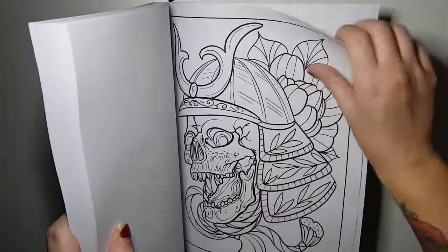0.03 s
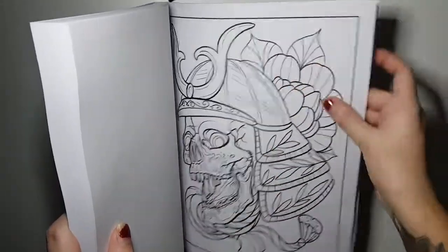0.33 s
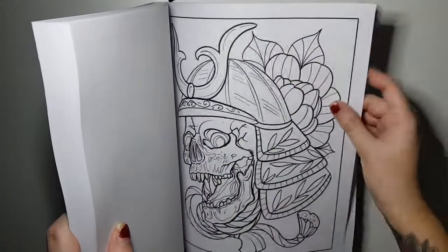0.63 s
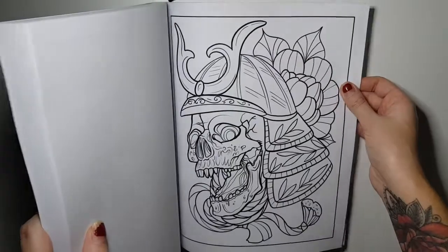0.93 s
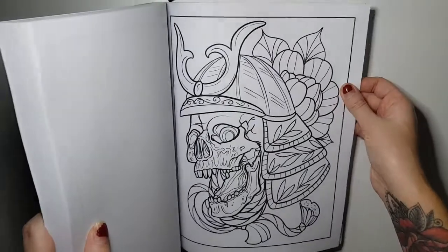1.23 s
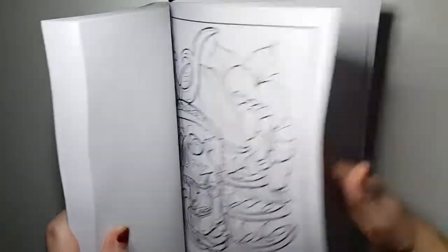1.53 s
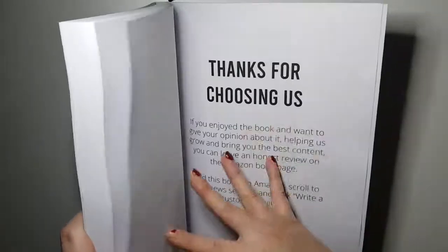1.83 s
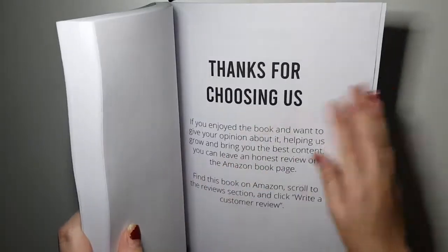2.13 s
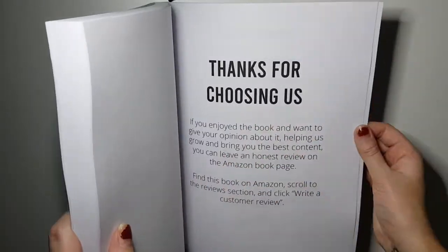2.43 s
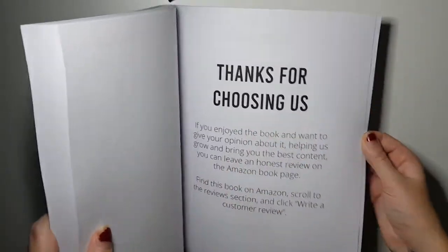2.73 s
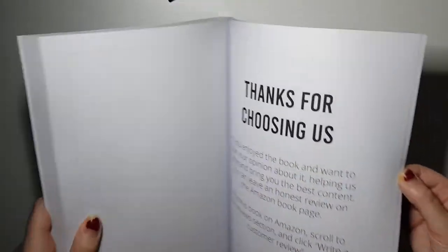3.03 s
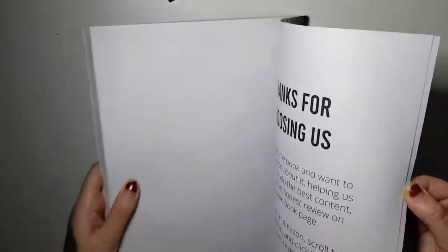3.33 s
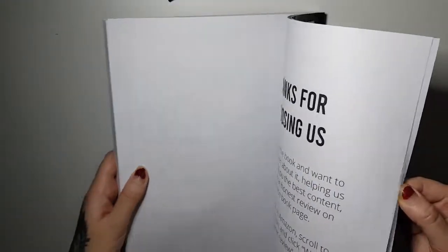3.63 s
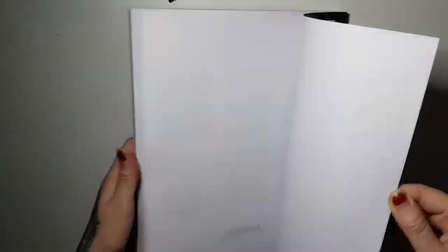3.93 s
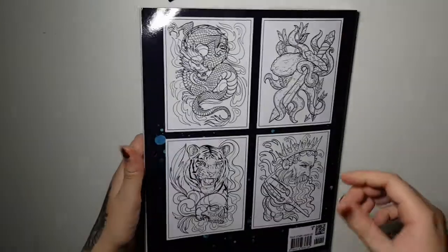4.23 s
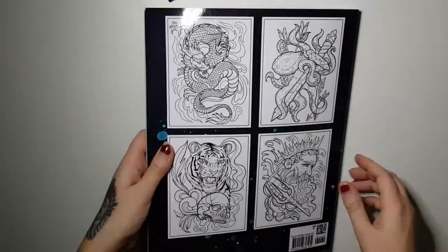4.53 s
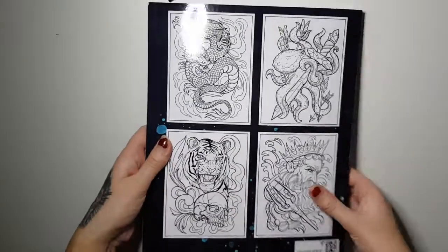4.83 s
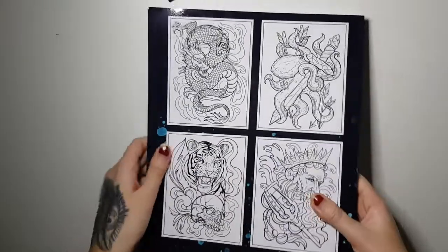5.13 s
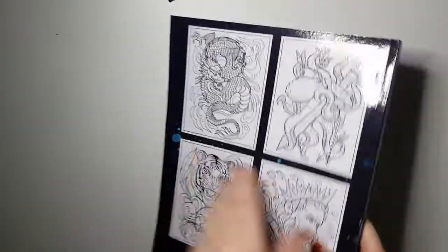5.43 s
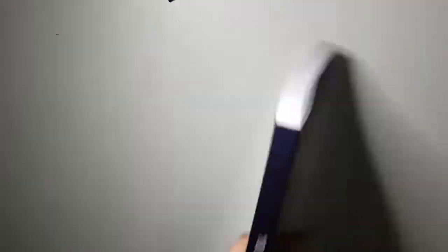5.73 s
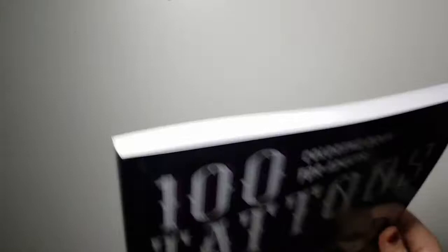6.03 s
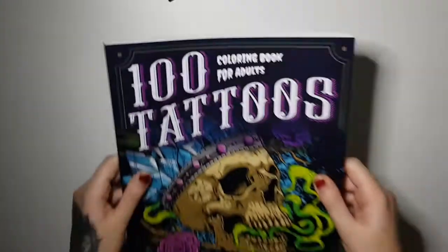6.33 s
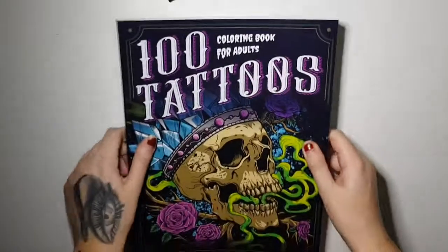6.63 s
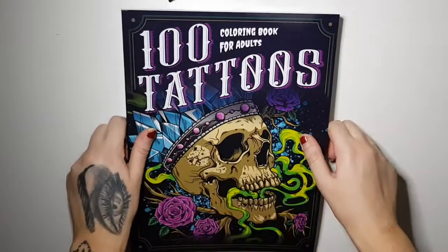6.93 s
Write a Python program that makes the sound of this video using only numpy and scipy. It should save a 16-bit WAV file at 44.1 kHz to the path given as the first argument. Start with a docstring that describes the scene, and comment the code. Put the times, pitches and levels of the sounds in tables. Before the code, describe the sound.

A large paperback is handled close to the microphone in a small room, over a faint low rumble and hiss. From the start to about 2.4 seconds, fingers slide and turn pages with soft, scratchy rustles and light taps; there is a crisp flick at 0.2 seconds, a fuller page sweep around 1.5 and a soft bump at 1.8. From 2.6 seconds the cover rubs, swelling into a hollow rush just after 3. At about 4.1 seconds the book claps shut with a quick slap of leaves and a thud, the loudest event. Two sharp knocks follow around 4.7 seconds. Between 5.1 and 5.8, fingers tap and skin slides as the book is turned over, its glossy cover giving a short rising hiss. From 6.3 to 6.7 seconds it is set down with light taps and soft thumps, and faint sliding ends near 7.

```python
"""A large paperback on a table in a small room, close to the microphones.
0-2.5 s: fingers slide pages off the stack and turn them; fibres catch and slip, sheets flick.
2.6-4 s: a hand rubs along the cover. 4.1 s: the book claps shut; leaves slap, the block thuds.
4.6-5.8 s: it is turned over, its glossy cover hissing. 6.3-7.1 s: it is set down.
Low rumble and faint hiss throughout."""
import sys
import numpy as np
from scipy import signal
from scipy.fft import rfft, irfft
from scipy.io import wavfile
from scipy.ndimage import uniform_filter1d, map_coordinates

SR = 44100
rng = np.random.default_rng(int(sys.argv[2]) if len(sys.argv) > 2 else 0)


def file_out(sig):
    """Save sig as 16-bit WAV at sys.argv[1]."""
    # one column per channel
    cols = np.atleast_2d(sig).T
    # limit, then scale
    lim = np.clip(cols, -1, 1)
    pcm = np.round(lim * 32767).astype(np.int16)
    wavfile.write(sys.argv[1], SR, pcm)


N = 317520
TIME_S = np.arange(N) / SR

# Table levels are relative. Attack, release, rise and fall are times for 20 dB.
# page drawn over the stack: start/s, end/s, swell/dB, release/s, rasp/dB, scratch/dB, hiss/dB
PAGE_STROKES = [(0.025, 0.11, -4.5, .08, -65.5, -61.5, -62), (0.14, 0.185, 8.5, 0.015, -59.5, -50.5, -50),
                (0.3, 0.45, 1, .14, -57.5, -59, -65.5), (0.53, 0.67, -0.5, 0.36, -61.5, -57.5, -69),
                (0.79, 0.98, -7, 0.045, -60.5, -62.5, -68.5), (1.35, 1.4, 13, .05, -77, -69.5, -66.5),
                (1.43, 1.69, -0.5, 0.19, -53.5, -57.5, -68), (1.572, 1.6, 8, 0.06, -45, -68, -84),
                (1.71, 1.79, 3.5, 0.088, -58, -71, -70), (1.97, 2.22, 6, 0.29, -74, -76.5, -70.5)]
# hand and cover dragging: start/s, end/s, swell/dB, release/s, body/dB, rasp/dB, hiss/dB
RUB_STROKES = [(2.61, 2.78, 2, 0.13, -83, -66.5, -76.5), (2.83, 2.92, -2, 0.2, -61, -67, -63.5),
               (3.04, 3.27, 3, 0.22, -47.5, -44.5, -58.5), (3.93, 4.03, -3.5, 0.11, -67, -79.5, -69)]
# shut book sliding through the hands: start/s, end/s, swell/dB, release/s, rasp/dB, hiss/dB
SLIDE_STROKES = [(4.58, 4.72, 12, .06, -74.5, -72.5), (4.92, 5.1, 0, .08, -79, -80),
                 (5.2, 5.35, -2.5, 0.11, -62, -68.5), (5.4, 5.71, 10, .08, -73, -60.5),
                 (5.725, 5.755, 1, 0.07, -69.5, -53), (6.65, 6.86, -4, 0.12, -72, -78),
                 (7.05, 7.12, 0, 0.077, -77.5, -94.5)]
# bundles of leaves slapping together: t/s, level/dB, brightness/Hz, rise/s, fall/s
LEAF_SLAPS = [(4.076, -41, 5000, 0.025, .03), (4.111, -27.5, 1990, 0.0043, 0.055),
              (4.142, -21.5, 1900, .05, .04), (4.195, -38, 800, 0.018, .09),
              (4.258, -35.5, 750, 0.033, 0.039)]
# blows on the book: t/s, level/dB, contact f/Hz
BLOWS = [(0.208, -39.5, 212), (1.803, -34, 91), (4.078, -30.5, 217), (4.1053, -20.5, 217),
         (4.111, -17, 217), (4.137, -34, 110), (4.194, -36, 217), (4.251, -30, 217), (4.663, -36.5, 231),
         (4.694, -19, 283), (4.706, -24.5, 390), (4.7734, -26, 332), (5.178, -35, 336), (5.227, -34, 92),
         (5.422, -38.5, 92), (5.728, -41.5, 298), (6.5198, -25.5, 98.6), (6.5744, -34, 293),
         (6.677, -28.5, 113.4)]
# swings of the block and cover: f/Hz, level/dB, t60/s
SWING_MODES = [(100, -0.5, .105), (225.5, 1.5, 0.052), (387, -0.5, 0.025)]
# paper flicks, finger taps: t/s, knock/dB, knock f/Hz, crack/dB, t60/s, left minus right/dB
TOUCHES = [(0.198, -37, 800, -38, 0.022, -3.5), (0.2201, -30, 2330, -59, .0046, 0),
           (0.546, -39, 1100, -48, 0.0083, -6), (0.868, -38.5, 1590, -55, 0.015, 0),
           (0.887, -46, 1110, -44, 0.015, -3), (0.929, -46, 1100, -53, 0.02, -1),
           (1.568, -38, 960, -47, 0.054, -2), (1.587, -43.5, 960, -63, .08, 0),
           (1.71, -43.5, 880, -70, 0.063, -2), (2.213, -61, 1490, -49.5, 0.047, -6),
           (2.241, -51, 620, -44.5, 0.047, -1.5), (2.439, -58, 950, -63, 0.06, -3.5),
           (3.719, -46, 915, -44, 0.022, -3.5), (3.741, -39, 960, -35.5, 0.036, -2.5),
           (3.755, -36.5, 647, -37, 0.028, 0), (4.064, -48, 1250, -41.5, .04, -3),
           (4.0721, -28.5, 1260, -33, 0.023, -2), (4.437, -54.5, 1000, -61.5, 0.048, -4),
           (4.570, -55.5, 532, -80, 0.042, -1), (4.619, -49, 500, -60, 0.05, -4),
           (4.694, -51, 1540, -61, 0.062, -9), (4.705, -42, 1500, -61, 0.015, -6),
           (4.7726, -27.5, 880, -44.5, 0.0083, -1.5), (5.127, -51, 1200, -52.5, .02, -4),
           (5.139, -46, 1200, -42.5, 0.04, -2), (5.174, -35, 1190, -40.5, 0.06, -2),
           (5.282, -40.5, 640, -73, .023, -2), (5.326, -45.5, 870, -67, 0.028, 1),
           (6.2814, -44.5, 1305, -41, 0.042, -3.5), (6.289, -46, 560, -57, .06, -5.5),
           (6.51, -39.5, 1076, -48.5, 0.033, -0.5), (6.574, -36, 925, -39, .028, -2),
           (6.677, -51.5, 400, -61, 0.065, 0), (6.867, -57, 1000, -70, 0.012, -4)]
# sheet or cover snapping straight: t/s, level/dB, f/Hz, t60/s
SHEET_SNAPS = [(0.2197, -28.5, 2540, 0.0081), (4.1375, -19.5, 2260, 0.018), (4.7723, -28.5, 1705, .016)]
# fingertip or sheet edge half singing: start/s, end/s, f/Hz, level/dB
DRAG_SQUEAKS = [(0.01, 0.094, 3350, -60), (0.11, 0.15, 5100, -47.5), (0.25, 0.5, 2670, -62),
                (0.46, 0.566, 1020, -64), (0.56, 0.643, 2750, -56.5), (1.61, 1.695, 2970, -54),
                (1.65, 1.695, 4380, -54), (1.933, 2.006, 1640, -69), (2.552, 2.775, 910, -69),
                (6.691, 6.93, 1800, -76)]
# standing waves between book, table and walls, nodes negative: f/Hz, width/Hz, left/dB, right/dB
STANDING_WAVES = [(170, 5.7, 1, 9.5), (209.8, 17, 8, 3), (248, 18, 3.5, -2.5), (300, 6.8, -3, 0),
                  (348, 11, 11, 6), (405, 15.3, 8, 9), (538.2, 14, 5, 8.5), (623, 36, -4.5, 2),
                  (672, 17, 6.5, 8), (754, 11, 6.5, 6.5), (808, 10, 0.5, 8.5), (928, 4.5, 4.5, 1),
                  (982, 13, -9, 3.5), (1015, 20, -2.5, 1.5), (1106, 14, -0.5, 7), (1230, 11, 2.5, 1),
                  (1375, 6.3, -5, 6.5), (1507, 11, -7, 4.5), (1671, 22, -6.5, 3.5), (2030, 39.5, -4, 3.5)]
# rumble of room and table: t/s, level/dB
RUMBLE_ENVELOPE = [(0, -53.5), (3.2, -55), (5.4, -54.5), (6.2, -59.5), (6.7, -55), (7.2, -60.5)]

# tone colours as heard, the bright ones dipping near 8 kHz: f/Hz, level/dB
SHEET_RASP_SPECTRUM = [(130, -5.5), (220, -0.5), (320, -18), (480, -11), (800, 3), (1100, 2), (1600, -2),
                       (2200, -14), (3500, -11)]
EDGE_SCRATCH_SPECTRUM = [(1500, -21), (2300, -7), (3000, 0), (3700, -6), (4500, -4), (6200, -9.5),
                         (8000, -18), (14000, -11)]
FIBRE_HISS_SPECTRUM = [(3500, 3), (6000, -1.5), (7800, -7), (10500, 0), (13000, -1), (15000, -15)]
COVER_BODY_SPECTRUM = [(80, -5), (140, -8.5), (200, 6), (295, 1), (420, -2.5), (700, -12), (1100, -13.5),
                       (2000, -56)]
COVER_RASP_SPECTRUM = [(400, -16.5), (800, 1.5), (1150, -5), (1550, -7.5), (2000, -16), (2700, -21.5),
                       (5000, -40)]
COVER_HISS_SPECTRUM = [(1200, -7.5), (2600, -4), (4000, 0), (6200, 0), (7800, -5), (11000, 1.5),
                       (14500, -9.5)]
SKIN_RASP_SPECTRUM = [(200, 1), (500, -2), (900, -7.5), (1900, -4.5), (3000, -7), (6000, -15)]
GLOSS_HISS_SPECTRUM = [(1500, -48), (2800, -12.5), (4000, -5.5), (6200, -2.5), (7800, -5.5), (11000, 2),
                       (14500, -3)]
CLAP_SPECTRUM = [(60, -9), (150, -9), (300, -7), (550, -9.5), (900, -1.5), (1200, -5.5), (2200, -0.5),
                 (2800, -13), (5000, -18.5), (12000, -27.5)]
CRACK_SPECTRUM = [(600, -12.5), (1500, 2.5), (2800, 2), (5500, -1.5), (7800, -11), (11000, -5.5),
                  (15000, -18.5)]
RUMBLE_SPECTRUM = [(20, -17.5), (35, -10), (60, 4), (90, 0), (130, -1.5), (170, -9.5), (210, -7.5),
                   (280, -21), (400, -30), (800, -43), (2000, -44)]
BACKGROUND_HISS_SPECTRUM = [(300, 13.5), (1000, 4), (2000, 1.5), (4000, -1.5), (6200, 0.5), (7800, -19),
                            (9500, 0), (12000, 6.5), (14500, 3)]


def pages(flutter_db=1.5):
    """A sheet rasps as it bows, its edge scratches over the stack, its fibres hiss."""
    flutter = from_db(flutter_db * drift(rate_hz=24.34))
    rasp, scratch, hiss = strokes(PAGE_STROKES, attack_s=0.097) * flutter
    hiss *= friction(FIBRE_HISS_SPECTRUM, per_s=12000, spread_db=2.5, patchy_db=1)
    rasp *= friction(SHEET_RASP_SPECTRUM, per_s=2800, spread_db=5.5, patchy_db=5)
    scratch *= friction(EDGE_SCRATCH_SPECTRUM, per_s=5500, spread_db=5.5, patchy_db=5)
    return from_db(-6) * rasp + from_db(-1) * scratch + from_db(3) * hiss


def cover_rub():
    """The open book is dragged; its broad cover gives a hollow rush."""
    body, rasp, hiss = strokes(RUB_STROKES, attack_s=0.11, hiss_swell_ratio=2.6)
    body *= friction(COVER_BODY_SPECTRUM, per_s=4000, spread_db=1, patchy_db=-2.5)
    rasp *= friction(COVER_RASP_SPECTRUM, per_s=8000, spread_db=-1, patchy_db=2)
    hiss *= friction(COVER_HISS_SPECTRUM, per_s=20000, spread_db=-7, patchy_db=-0.6)
    return from_db(1) * body + from_db(-6) * rasp + from_db(1.6) * hiss


def cover_slide():
    """Skin rasps on the spine; the glossy cover hisses as it swings round."""
    rasp, hiss = strokes(SLIDE_STROKES, attack_s=0.055)
    rasp *= friction(SKIN_RASP_SPECTRUM, per_s=640, spread_db=3.5, patchy_db=-0.5)
    hiss *= friction(GLOSS_HISS_SPECTRUM, per_s=40000, spread_db=4.5, patchy_db=3)
    return from_db(-0.5) * rasp + from_db(2.5) * hiss


def clap(dulling_oct_per_db=0.12):
    """Leaves land in quick succession, bright at first, then duller; each slap dulls as it fades."""
    t_s, level_db, brightness_hz, rise_s, fall_s = np.transpose(LEAF_SLAPS)[:, :, None]
    fades_db = ramps_db(TIME_S, t_s, t_s, rise_s, fall_s)
    power = from_db(level_db + fades_db) ** 2
    cutoff_oct = np.average(np.log2(brightness_hz) + dulling_oct_per_db * fades_db, weights=power, axis=0)
    leaves = coloured(slips(per_s=3000, spread_db=-4.5), CLAP_SPECTRUM)
    # moving low-pass: crossfade along a filter bank
    bank_hz = np.geomspace(400, 12800, 11)
    bank = [unit_rms(butter(leaves, hz, "low", order=7)) for hz in bank_hz]
    place = np.interp(cutoff_oct, np.log2(bank_hz), np.arange(len(bank)))
    slaps = sum(np.maximum(1 - abs(place - k), 0) * dulled for k, dulled in enumerate(bank))
    local_rms = np.sqrt(np.abs(uniform_filter1d(slaps ** 2, size=500)) + 1e-9)
    return from_db(-2) * slaps / local_rms * np.sqrt(power.sum(axis=0))


def thuds(detune_db_per_oct=22.5):
    """The block swings slowly, the cover fast; a blow favours the mode nearest its contact pitch."""
    out = np.zeros(N + SR)
    for t_s, level_db, contact_hz in BLOWS:
        for hz, mode_db, t60_s in SWING_MODES:
            detune_db = detune_db_per_oct * abs(np.log2(hz / contact_hz))
            span, wave = damped_sine(t_s, level_db + mode_db - detune_db, hz, t60_s)
            out[span] += wave
    return from_db(-3) * butter(out[:N] + 1e-18, 900, "low", order=3)


def taps(graze_db=-15.5, graze_rise_s=0.016):
    """A finger grazes the paper, then lands: damped knock of the sheet, crack of its edge."""
    out = np.zeros((2, N + SR))
    crack = np.r_[coloured(slips(per_s=9000, spread_db=2.4), CRACK_SPECTRUM), np.zeros(SR)]
    for t_s, knock_db, hz, crack_db, t60_s, pan_db in TOUCHES:
        span, age_s, fade = decay(t_s, t60_s)
        fade *= 1 - np.exp(-age_s / (0.038 * t60_s))   # softer touch, slower onset
        burst = whiten(rng.standard_normal(len(age_s)) * fade) * fade ** 0.08
        burst = butter(burst, [0.49 * hz, 2.3 * hz], "band", order=1)
        burst = butter(burst, 1.42 * hz, "low", order=4)
        knock = unit_rms(burst) * np.sqrt(np.mean(fade ** 2))
        pan = stereo_gain(pan_db / 2, -pan_db / 2)
        out[:, span] += (from_db(knock_db) * knock + from_db(crack_db) * crack[span] * fade) * pan
        before = slice(span.start - SR // 10, span.start)
        approach_db = -20 * (t_s - TIME_S[before]) / graze_rise_s
        out[:, before] += from_db(crack_db + graze_db + approach_db) * crack[before] * pan
    return from_db(-2.2) * out[:, :N]


def snaps():
    """Stiff paper springs back and rings for milliseconds."""
    out = np.zeros(N + SR)
    for t_s, level_db, hz, t60_s in SHEET_SNAPS:
        span, wave = damped_sine(t_s, level_db, hz, t60_s)
        out[span] += butter(wave + 1e-18, 1.1 * hz, "low", order=3)
    return out[:N]


def squeaks():
    """Slips fall nearly into step: a narrow, unsteady band swells and fades."""
    out = np.zeros(N)
    for start_s, end_s, hz, level_db in DRAG_SQUEAKS:
        first, count = int(start_s * SR), int((end_s - start_s) * SR)
        half_width_hz = 40 + 0.079 * hz
        band = butter(rng.standard_normal(count), [hz - half_width_hz, hz + half_width_hz], "band")
        out[first:first + count] += from_db(level_db) * unit_rms(band) * signal.windows.hann(count)
    return out


def strokes(rows, attack_s, hiss_swell_ratio=1, hop=25):
    """Strokes set in, change speed evenly, die away. One gain curve per layer, hiss last."""
    t_s = TIME_S[::hop]
    power = 0
    for start_s, end_s, swell_db, release_s, *levels_db in rows:
        progress = np.clip((t_s - start_s) / (end_s - start_s), 0, 1)
        swell_ratios = np.r_[np.ones(len(levels_db) - 1), hiss_swell_ratio]
        speed_db = np.outer(swell_ratios, swell_db * (progress - 0.5))
        edge_db = ramps_db(t_s, start_s, end_s, attack_s, release_s)
        power += from_db(np.c_[levels_db] + speed_db + edge_db) ** 2
    return np.sqrt(power).repeat(hop, axis=1)[:, :N]


def friction(spectrum, per_s, spread_db, patchy_db):
    """Slips shake a sheet whose bending favours now one band, now another."""
    edges_hz = np.geomspace(100, 16000, 17)
    sources = [slips(per_s, spread_db) for _ in range(2)]
    bands = [butter(sources[k % 2], edges_hz[k:k + 2], "band") for k in range(len(edges_hz) - 1)]
    patchy = sum(band * from_db(patchy_db * drift(rate_hz=35)) for band in bands)
    return coloured(patchy, spectrum)


def slips(per_s, spread_db):
    """Fibres catch and let go: tiny clicks of uneven size."""
    sizes = from_db(spread_db * np.minimum(rng.exponential(1, N), 4))
    signs = rng.choice([-1, 1], N)
    return unit_rms(sizes * signs * (rng.random(N) < per_s / SR))


def room(x, spots=5, spots_per_s=170):
    """Sound leaves the broad sheets now here, now there, so its reflections keep changing."""
    spot = (TIME_S * spots_per_s) % spots
    distance = np.abs((spot - np.arange(spots)[:, None] + spots / 2) % spots - spots / 2)
    shares = np.sqrt(np.maximum(1 - distance, 0))
    wet = sum(signal.oaconvolve(x * share, reflections(), axes=1)[:, :N] for share in shares)
    direct = np.array([np.r_[np.zeros(2), x[0, :-2]], x[1]])   # right microphone slightly nearer
    # microphone ports face away: treble arrives mostly via the walls
    treble_shelf = (from_db(-9.5) - 1) * direct + (from_db(1) - 1) * wet
    return direct + wet + butter(treble_shelf, 2700, "high", order=1)


def reflections(t60_s=0.19, gap_s=0.0012, split_hz=471):
    """Dense dying echoes; alike left and right in the bass, unrelated in the treble."""
    _, age_s, fade = decay(0, t60_s)
    near_walls = 1 + np.exp(-age_s / 0.007)
    echoes = whiten(rng.standard_normal((3, len(age_s))) * fade * near_walls * (age_s > gap_s))
    tail = butter(echoes[0], split_hz, "low") + butter(echoes[1:], split_hz, "high")
    return butter(tail, 540, "high", order=1)


def standing_waves(x):
    """Air modes ring on, with a different strength at each microphone."""
    for hz, width_hz, left_db, right_db in STANDING_WAVES:
        ring = signal.lfilter(*signal.iirpeak(hz, hz / width_hz, fs=SR), x)
        x = x + (stereo_gain(left_db, right_db) - 1) * ring
    return x


def background(hiss_db=-71.5):
    """Near-mono rumble of room and table, plus faint hiss."""
    mid, side = coloured(rng.standard_normal((2, N)), RUMBLE_SPECTRUM)
    rumble = (mid + from_db(-13.5) * side * [[1], [-1]]) * stereo_gain(-1.6, 1.1)
    rumble_db = np.interp(TIME_S, *np.transpose(RUMBLE_ENVELOPE))
    hiss = coloured(rng.standard_normal((2, N)), BACKGROUND_HISS_SPECTRUM)
    return from_db(rumble_db) * rumble + from_db(hiss_db) * hiss


def from_db(db):
    return 10 ** (np.asarray(db) / 20)


def stereo_gain(left_db, right_db):
    return from_db([[left_db], [right_db]])


def unit_rms(x):
    return x / np.sqrt(np.mean(x ** 2) + 1e-20)


def butter(x, hz, kind, order=2):
    return signal.sosfilt(signal.butter(order, hz, kind, fs=SR, output="sos"), x)


def coloured(x, spectrum):
    """Shape x by a spectrum, steep roll-off past its ends; rms 1."""
    hz, db = np.transpose(spectrum)
    log_f = np.log(np.fft.rfftfreq(N, 1 / SR) + 1)
    beyond = np.maximum(np.log(hz[0]) - log_f, 0) + np.maximum(log_f - np.log(hz[-1]), 0)
    gain_db = np.interp(log_f, np.log(hz), db) - 68 * beyond
    return unit_rms(irfft(rfft(x) * from_db(gain_db), N))


def whiten(x, smooth_hz=90):
    """Flatten a burst's spectrum, keeping its fine grain."""
    spectrum = rfft(x, SR)
    power = uniform_filter1d(np.abs(spectrum) ** 2, size=smooth_hz)
    return irfft(spectrum / np.sqrt(np.abs(power) + 1e-12), SR)[..., :x.shape[-1]]


def drift(rate_hz, hop=50):
    """Smooth random curve, spread about 1."""
    knots = rng.standard_normal(2000)
    return map_coordinates(knots, [TIME_S[::hop] * rate_hz], order=3, mode="wrap").repeat(hop)[:N]


def ramps_db(t_s, start_s, end_s, attack_s, release_s):
    """0 dB from start to end, straight slopes either side."""
    outside = np.maximum(start_s - t_s, 0) / attack_s + np.maximum(t_s - end_s, 0) / release_s
    return np.maximum(-20 * outside, -120)


def decay(start_s, t60_s):
    """Sample span, age and envelope for 1/3 s after a blow."""
    age_s = np.arange(SR // 3) / SR
    first = int(start_s * SR)
    return slice(first, first + len(age_s)), age_s, from_db(-60 * age_s / t60_s)


def damped_sine(start_s, level_db, hz, t60_s):
    span, age_s, fade = decay(start_s, t60_s)
    return span, from_db(level_db) * fade * np.sin(2 * np.pi * hz * age_s)


def scene():
    """Paper and book through the room, over the background."""
    paper = (pages() + squeaks() + cover_slide()) * stereo_gain(-0.5, 0.3)
    book = cover_rub() * stereo_gain(-0.6, 0.7) + clap() * stereo_gain(-0.5, 1) + thuds()
    snap = snaps()   # aimed at the microphones; stirs the room little
    in_room = room(paper + book + taps() + from_db(-9) * snap)
    return standing_waves(in_room + 1e-18) + from_db(-4.5) * snap + background()


def record(dry):
    """Steep treble cut."""
    cutoff_hz = 14650
    return signal.sosfilt(signal.ellip(12, 0.1, 80, cutoff_hz, fs=SR, output="sos"), dry)


dry = scene()
out = record(dry)
file_out(out)
```